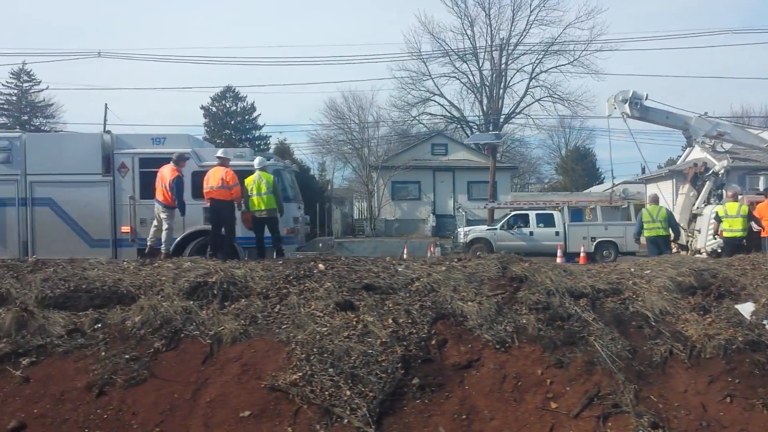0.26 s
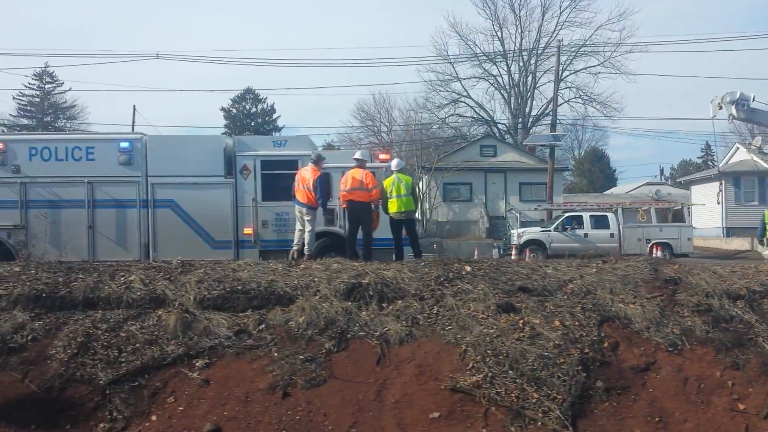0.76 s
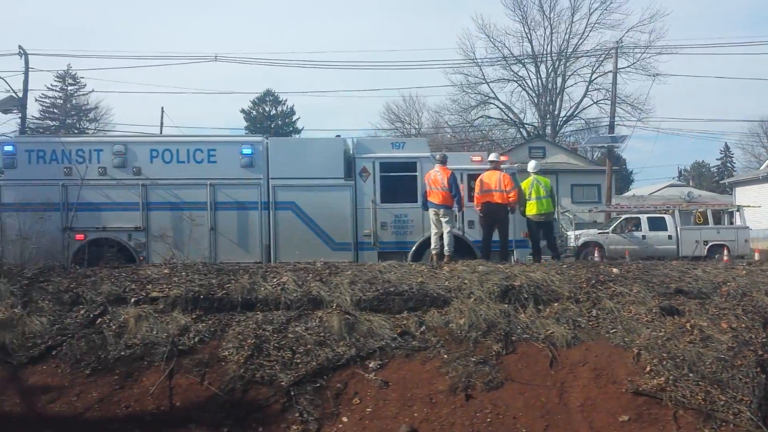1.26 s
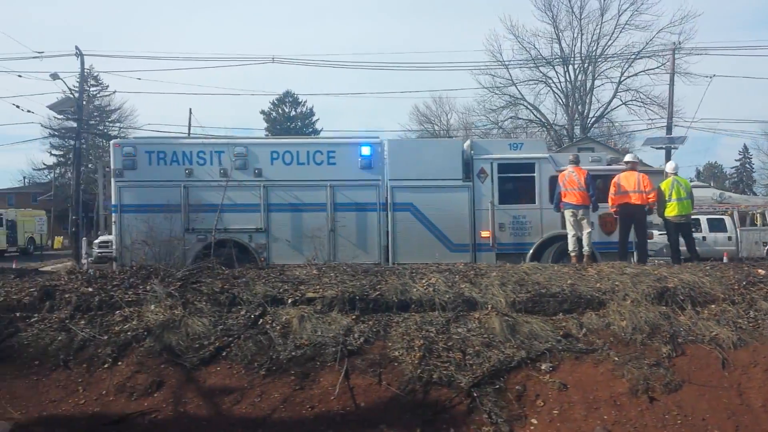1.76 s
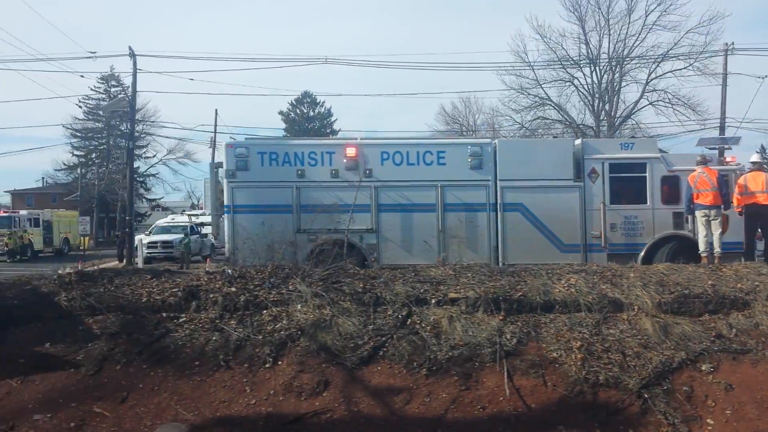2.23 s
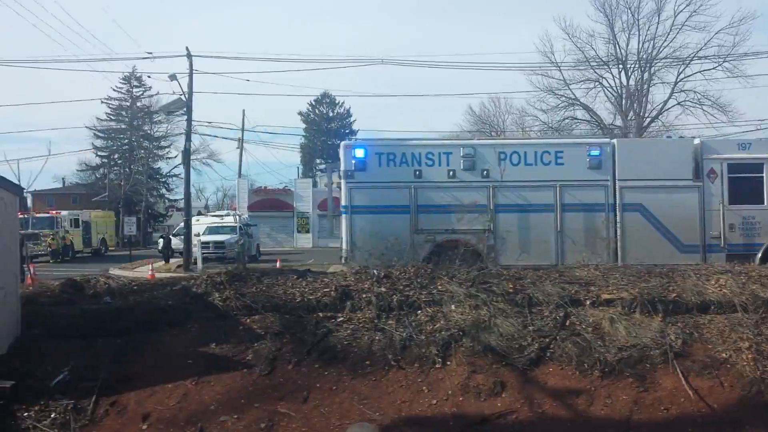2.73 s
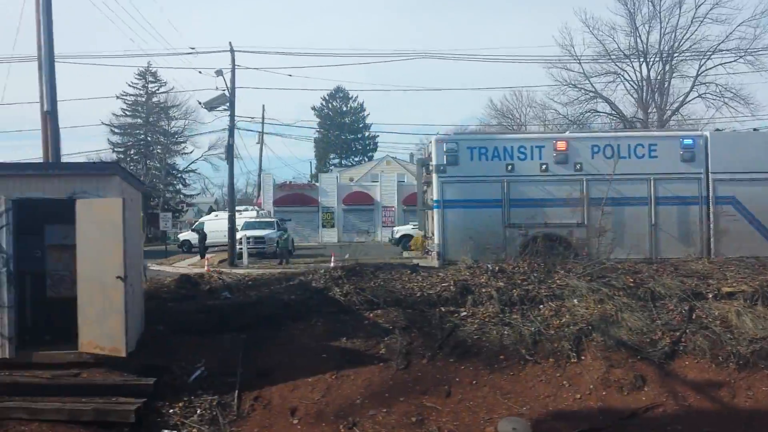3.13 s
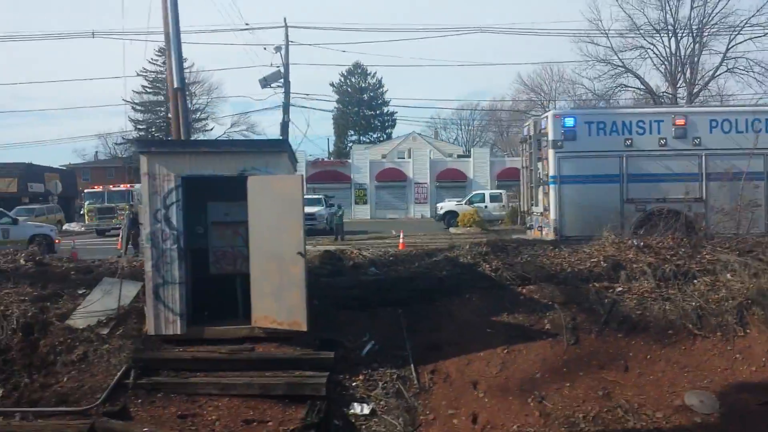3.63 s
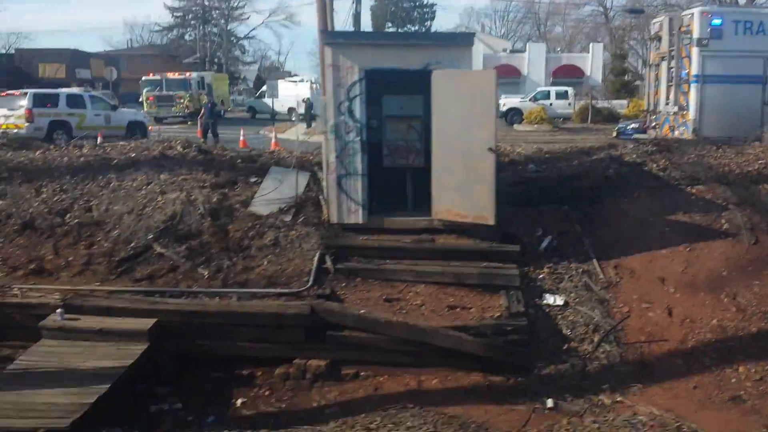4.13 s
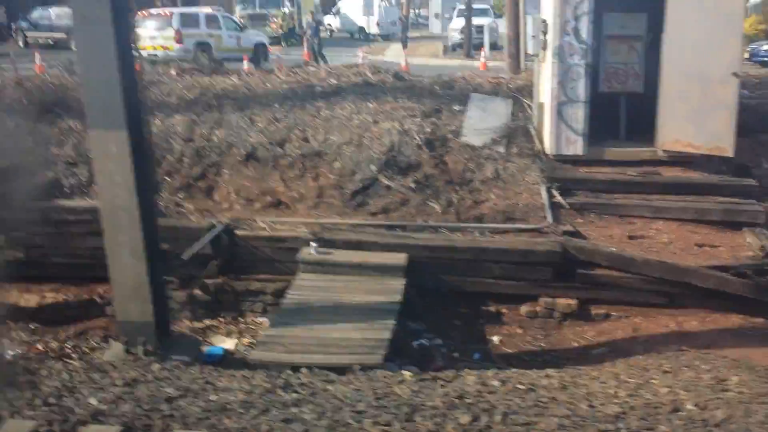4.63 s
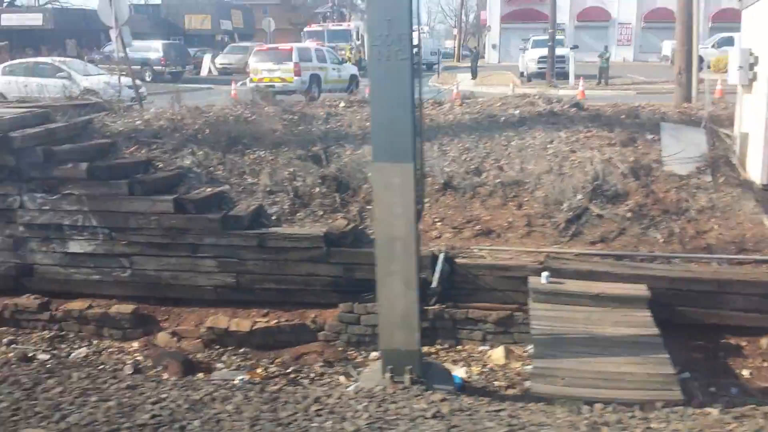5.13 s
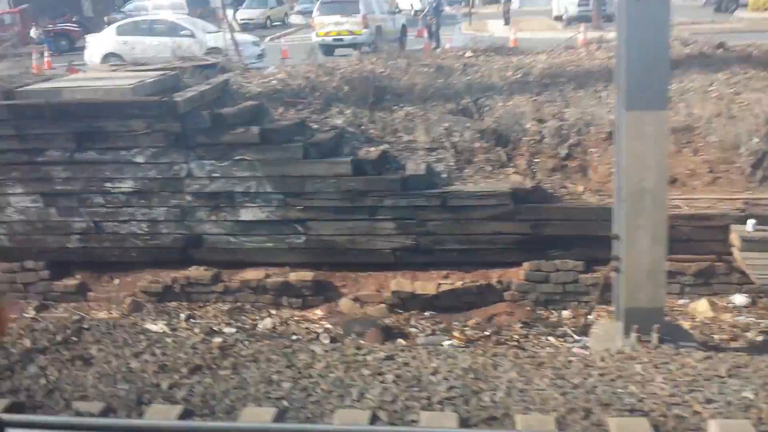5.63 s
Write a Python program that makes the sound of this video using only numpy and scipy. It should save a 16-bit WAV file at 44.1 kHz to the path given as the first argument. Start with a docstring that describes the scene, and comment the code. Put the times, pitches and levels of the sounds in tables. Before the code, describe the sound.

A low rumble, rushing air and electric hum inside a slowly rolling train, dipping briefly as fingers click on the microphone.

```python
"""A low rumble, rushing air and a whining hum inside a slowly rolling electric commuter train.
The wheels shake the car body, the ventilation blows through its ducts, and the traction transformer
sounds multiples of the 60 Hz supply. Fingers shift on a camera: its case ticks and pops, skin slides
past the microphone ports, and the cabin sound sinks for about two seconds."""
import sys
import numpy as np
from scipy.fft import rfft, irfft, next_fast_len
from scipy.io import wavfile
from scipy.ndimage import uniform_filter1d, map_coordinates

SR = 44100
rng = np.random.default_rng(int(sys.argv[2]) if len(sys.argv) > 2 else 0)


def output_pcm(signal):
    """Save a mono or channel-first signal as 16-bit PCM at the path in sys.argv[1].

    Samples are clipped to [-1, 1] before scaling.
    """
    pcm = np.clip(np.atleast_2d(signal).T, -1, 1) * 32767
    wavfile.write(sys.argv[1], SR, np.round(pcm).astype(np.int16))


N = 259292

PORT_HZ, PORT_WIDTH_HZ = 6320, 1300  # note of the port farther from the finger


def rumble():
    """Rolling wheels shake the low resonances of the car body."""
    # centre_hz, half_width_hz, level_db
    deep_modes = [(28, 6, -14), (49, 2.7, 0.5), (64.2, 3.8, 5.5), (86.4, 7.1, 6)]
    boom_modes = [(114, 9.4, -3.5), (126.5, 9.2, 2.5), (169.6, 10.4, -6.5), (224, 14, -12)]
    # time_s, deep_db, boom_db
    swell = [(0, 5, 2.5), (.3, 2, 4), (.54, -3.5, -0.5), (1.05, 1.5, 2), (1.3, 4, 0.5), (1.62, 0.5, 3.5),
             (1.85, 2, -5), (2.4, -4.5, 2), (3.1, 3, 0), (3.7, -4.5, -3), (4.1, -1, -5.5), (4.6, 4.5, 4.5),
             (5.3, 2, -4.5), (5.6, 9.5, 0.5), (5.88, 1, -1.5)]
    deep_swell_db, boom_swell_db = curves(swell)
    deep = amp(through_grip(-28, -44.5, -37.5) + deep_swell_db) * body_noise(deep_modes)
    boom = amp(through_grip(-24.5, -37.5, -23.5) + boom_swell_db) * body_noise(boom_modes)
    return deep + boom


def body_noise(modes, low_cut_hz=22):
    """Noise in low resonances, levelled because the wheels roll steadily."""
    boom = cabin_noise(lambda hz: modal_gain(hz, modes) * hz ** 6 / (hz ** 6 + low_cut_hz ** 6))
    power = uniform_filter1d(np.mean(boom ** 2, axis=0), size=7000)
    return boom / np.sqrt(np.abs(power))


def ventilation():
    """Air rushes through ducts, sounds the cabin's standing waves and hisses at the grilles."""
    # freq_hz, level_db
    air_spectrum = [(100, -4), (200, 2.5), (300, 0), (480, -4), (640, -5), (830, -7), (1000, -9.5),
                    (1250, -12), (1700, -11.5), (2100, -16.5), (3000, -25), (4500, -40), (8000, -79)]
    hiss_spectrum = [(1200, -25), (2200, 1.5), (3300, 2), (4500, 1.5), (5600, 4), (6600, 5), (8000, -4),
                     (10000, -11), (11500, -32.5), (15000, -61)]
    # centre_hz, half_width_hz, lift_db
    cabin_modes = [(406, 9.5, 0.5), (465.6, 6, 7), (531.4, 3.9, 13), (693, 7.2, 5), (1770, 130, -1)]
    lift_db = lambda hz: sum(db * resonance(hz, centre, width) for centre, width, db in cabin_modes)
    air_db = through_grip(-29, -43.5, -31.5) + 0.5 * wobble(9)
    air = cabin_noise(lambda hz: amp(along(air_spectrum, hz) + lift_db(hz)))
    hiss_db = through_grip(-40.5, -57, -48) + 0.14 * wobble(1.4)
    hiss = cabin_noise(lambda hz: amp(along(hiss_spectrum, hz)))
    return amp(air_db) * air + amp(hiss_db) * hiss


def transformer(supply_hz=60.09):
    """Supply harmonics stand as waves in the cabin; their balance shifts as the grip moves the camera."""
    # harmonic, level_db, moved_level_db
    drone = [(1, -31, -34.5), (2, -31.5, -30), (3, -32.5, -31.5)]
    # harmonic, level_db, moved_level_db, left_minus_right_db, left_lead_rad
    whine = [(4, -42, -43, -1, 0.5), (5, -41, -46, 13, -1.6), (6, -39.5, -40.5, -4.5, 0),
             (8, -41.5, -43.5, -2, 0), (12, -35.5, -43, -24.5, -3), (13, -40, -41.5, -4.5, 1.5),
             (14, -48.5, -49, -5.5, 0), (18, -54.5, -48, -4, 1), (20, -33, -34, -2.5, 1),
             (24, -40, -38.5, -5.5, -2.5), (25, -63, -49.5, -5, -1), (27, -51.5, -48.5, -21, 0.8),
             (28, -50, -42.5, 12, 1.5), (30, -42.5, -44, 0.5, 1.61), (31, -61, -54, 4, -3.5),
             (32, -63, -47.5, 22, 2), (34, -58.5, -61, 10, -0.5), (36, -56.5, -62, -8, -1),
             (38, -68, -68, 0, 1.5), (42, -58, -65, 5, -2), (44, -61, -63, 0, -1.5),
             (46, -58.5, -71, 8.5, 2), (47, -58, -67, -2, 0.5), (56, -62.5, -58.5, -2, 1.5),
             (60, -53, -65, 0, 2.5)]
    out = np.zeros((2, N))
    moved = gripped()
    supply_rad = 2 * np.pi * supply_hz * clock() + 0.0093 * wobble(1.4)
    for harmonic, db, moved_db in drone:  # long waves: in phase at both ports
        phase = harmonic * supply_rad + rng.uniform(0, 2 * np.pi) + 0.26 * wobble(4.13)
        level_db = db + moved * (moved_db - db) + 1.96 * wobble(4.104)
        out += pan(lean_db=1.7) * amp(level_db) * np.sin(phase)
    for harmonic, db, moved_db, lean_db, lead_rad in whine:
        sway_db = 0.29 * np.array([wobble(4.92), wobble(4.66)])  # car sway shifts the standing waves
        phase = harmonic * supply_rad + rng.uniform(0, 2 * np.pi) + 0.32 * wobble(7)
        port_rad = np.array([[lead_rad], [-lead_rad]]) / 2
        level_db = db + moved * (moved_db - db) + sway_db
        out += pan(lean_db) * amp(level_db) * np.sin(phase + port_rad)
    return np.sqrt(2) * out * amp(through_grip(-0.5, -14.5, -5.5))


def case_ticks(ring_low_hz=3700, top_hz=14260, spot_db=1.34, spot_hz=900,
               port_db=-4.5, leak_db=-8.5, far_delay_s=.00035):
    """The case snaps under the fingers; the far port answers later on its own note."""
    # start_s, level_db, ring_hz, tap_re_ring_db, crack_re_ring_db, left_minus_right_db
    ticks = [(2.5917, 3, 5770, -17, -5, -13), (2.6401, 9, 6300, -18, -2, 1), (2.6418, 11, 7500, -17, -6, 6),
             (2.6427, 17.5, 6900, -6.5, -8, 11), (2.6604, -1.5, 6700, 1.5, -16, -10),
             (2.6774, -3.5, 5630, -15, -4, -22), (2.7346, 1, 5720, -2, -20, -4),
             (2.7375, -3, 7500, -11, -15, 6), (2.826, -10, 6180, 3, -14, 4),
             (2.8396, 10, 6700, -8, -17, -9), (2.8596, 8, 6470, -17, -12, -24),
             (2.9827, 5.5, 5800, -0.5, -15, -9), (3.1096, -14, 7140, -21, -2, 13),
             (3.3075, 12.5, 5417, -16, -2, -11), (3.4647, 13, 6450, -19, -10, -22),
             (3.4665, -0.5, 6940, -2.5, -8, 0), (3.6021, 2.5, 5070, -12, -14, -9),
             (3.9545, 5, 5900, -10, -9.6, -13), (3.9908, -12, 4140, 7, -26, -15),
             (4.004, -1.3, 6400, 0.5, -15, 3), (4.0434, 11, 5900, -25, -5.5, -16),
             (4.0994, -8, 5300, -13, -26, -14), (4.6192, -16.5, 3730, 7, -20, -17),
             (4.7131, -12, 3960, 2, -25, -6), (5.1005, 10.5, 7300, -11, -6, 3),
             (5.1013, 14, 7050, -4.5, -14, 14), (5.1427, 0, 6240, 4, -17, -0.5),
             (5.1751, -13, 5950, -6, 2, 0.5), (5.3099, 12, 5850, -17, -16, -19),
             (5.6371, 3, 6000, -10, -10, -12)]
    # freq_hz, level_db
    crack_spectrum = [(4000, -33), (7500, -18), (9300, 0), (11500, -4.5), (13800, -3)]
    out = np.zeros((2, N + SR))
    hz = np.fft.rfftfreq(1024, 1 / SR)
    lowpass = 1 / (1 + (hz / top_hz) ** 60)
    for start_s, db, ring_hz, tap_db, crack_db, lean_db in ticks:
        ring = resonance(hz, ring_hz, width_hz=2100) / (1 + (ring_low_hz / (hz + 1)) ** 10)
        tap = amp(tap_db) * resonance(hz, centre_hz=2850, width_hz=1300) ** 2
        crack = amp(crack_db + along(crack_spectrum, hz))
        # each touch lands on another spot, with its own spectral ripple
        ripple_db = spot_db * map_coordinates(rng.standard_normal(40), [hz / spot_hz], mode="nearest")
        near = np.sqrt(ring ** 2 + tap ** 2 + crack ** 2) * amp(ripple_db)
        port_note = amp(port_db) * resonance(hz, PORT_HZ, PORT_WIDTH_HZ)
        far = amp(-abs(lean_db)) * (port_note + amp(leak_db) * near)
        near_port = int(lean_db < 0)
        for port, gain, delay_s in (near_port, near, 0), (1 - near_port, far, far_delay_s):
            snap = amp(db) * struck(gain * lowpass)
            start = round((start_s + delay_s) * SR)
            out[port, start:start + len(snap)] += snap
    return out[:, :N]


def fingertip_pops(rise_s=0.00011):
    """A fingertip leaves a port; the hollow case answers with a thud and a knock."""
    # start_s, thud_db, knock_db, left_minus_right_db
    pops = [(2.6425, -32, -13.5, -1), (2.8372, -17, -3.5, -19), (2.983, -44, -12.5, -21),
            (3.3073, -45, -15.5, -21), (4.0438, -45, -19, -13), (5.1008, -35, -24, -25)]
    # pitch_hz, t60_s
    hollow_modes = [(430, 0.0026), (1180, 0.0031)]
    out = np.zeros((2, N))
    for start_s, *notes_db, lean_db in pops:
        age_s = np.maximum(clock() - start_s, 0)
        onset = pan(lean_db) * (1 - np.exp(-age_s / rise_s))
        for (hz, t60_s), db in zip(hollow_modes, notes_db):
            decay_db = np.minimum(60 * age_s / t60_s, 200)
            out += onset * amp(db - decay_db) * np.sin(2 * np.pi * hz * age_s)
    return out


def skin_slides(drag_db=1.8, whistle_db=-6):
    """Skin drags over the case in grainy swishes; the far port whistles on its own note."""
    # middle_s, sigma_s, level_db, left_minus_right_db
    slides = [(2.674, 0.017, -44, -15), (2.736, 0.011, -39, -11), (2.898, 0.0053, -44.5, -3),
              (3.305, 0.035, -53, -22), (3.477, 0.018, -52.5, 1), (3.66, 0.026, -45.5, -27),
              (3.834, 0.12, -52.5, -27), (3.96, 0.016, -44, -15), (5.766, 0.17, -48, -10)]
    # freq_hz, level_db
    skin_spectrum = [(1500, -13), (4000, -3), (6000, 2), (9000, 1.5), (12300, -5.5), (13600, -9),
                     (14600, -40)]
    grain = amp(drag_db * wobble(90)) * grit(rate_hz=4500, spread_db=2)
    swish = unit(filtered(grain, lambda hz: amp(along(skin_spectrum, hz))))
    whistle = amp(whistle_db) * unit(filtered(grain, lambda hz: resonance(hz, PORT_HZ, PORT_WIDTH_HZ)))
    out = np.zeros((2, N))
    for middle_s, sigma_s, db, lean_db in slides:
        far_side = np.array([[lean_db < 0], [lean_db >= 0]])
        out += amp(db) * bump(middle_s, sigma_s) * (pan(lean_db) * swish + far_side * whistle)
    return out


def scuff(start_s=4.395, attack_s=.004, fade_s=0.061, level_db=-34, top_hz=9500):
    """Something scrapes briefly in the car: a run of catches rings its resonances."""
    # centre_hz, half_width_hz, level_db
    modes = [(1170, 110, -6), (1450, 70, -1.5), (1720, 130, 0), (2120, 220, -6), (2800, 180, -14),
             (3370, 230, -8), (3900, 350, -17), (5370, 530, -17), (6800, 1800, -20.5)]
    age_s = np.maximum(clock() - start_s, 0)
    stroke = amp(level_db) * (1 - np.exp(-age_s / attack_s)) / (1 + (age_s / fade_s) ** 3)
    catches = grit(rate_hz=5000, spread_db=2.5)
    rasp = unit(filtered(catches, lambda hz: modal_gain(hz, modes) / (1 + (hz / top_hz) ** 16)))
    return pan(lean_db=6) * stroke * rasp


def spurt(level_db=-35):
    """A short, narrow, grainy hiss on the left."""
    # freq_hz, level_db
    spectrum = [(3500, -27), (5600, -9), (6500, -3), (6950, -3), (7500, -7), (10000, -19), (12000, -50),
                (14000, -92)]
    grain = amp(1.4 * wobble(130)) * grit(rate_hz=3300, spread_db=5)
    hiss = unit(filtered(grain, lambda hz: amp(along(spectrum, hz))))
    return pan(lean_db=26) * amp(level_db) * bump(middle_s=2.232, sigma_s=0.046) * hiss


def singing_air(level_db=-40):
    """A faint hollow band swells in the rush just before the cabin sound sinks."""
    swell = bump(middle_s=2.52, sigma_s=0.24) * (1 - gripped())
    return amp(level_db) * swell * cabin_noise(lambda hz: resonance(hz, centre_hz=1820, width_hz=170))


def gripped(start_s=2.604, halfway_s=0.044):
    """Closure of the hand on the camera, 0 to 1: fast, then ever slower."""
    age_s = np.maximum(clock() - start_s, 0)
    return age_s / (age_s + halfway_s)


def through_grip(before_db, during_db, after_db, release_s=4.757, recover_s=0.37, squeeze_db=-4.5):
    """Layer level in dB: sinks as the hand closes, dips at a squeeze, rises as it opens."""
    released = np.clip((clock() - release_s) / recover_s, 0, 1)
    dip_db = squeeze_db * bump(middle_s=3.32, sigma_s=0.12)
    return before_db + (during_db - before_db) * gripped() + (after_db - during_db) * released + dip_db


def cabin_noise(colour, alike_below_hz=480):
    """Diffuse noise, rms 1: alike at both ports in the bass, unrelated in the treble."""
    # freq_hz, left_minus_right_db
    lean = [(100, 1), (380, 3), (800, 2), (2300, 1.5), (4400, 6), (8000, 11), (12000, -34)]
    alike = lambda hz: .99 / (1 + (hz / alike_below_hz) ** 2.8)
    white = rng.standard_normal((2, N))
    mid, side = filtered(white, lambda hz: colour(hz) * np.sqrt([1 + alike(hz), 1 - alike(hz)]))
    return unit(filtered(np.array([mid + side, mid - side]), lambda hz: pan(along(lean, hz))))


def grit(rate_hz, spread_db):
    """Tiny catches of uneven size at random times; stereo, rms 1."""
    catches = rng.random((2, N)) < rate_hz / SR
    return unit(catches * rng.choice([-1, 1], (2, N)) * amp(spread_db * rng.standard_normal((2, N))))


def struck(gain):
    """Minimum-phase ring of a body with this spectrum after one sharp blow."""
    cepstrum = irfft(np.log(np.maximum(gain, 1e-4)))
    half = cepstrum.shape[-1] // 2
    cepstrum[..., 1:half] *= 2
    cepstrum[..., half + 1:] = 0
    return irfft(np.exp(rfft(cepstrum)))


def resonance(hz, centre_hz, width_hz):
    """Gain 1 at the centre, 1/2 at width_hz to either side."""
    return 1 / (1 + ((hz - centre_hz) / width_hz) ** 2)


def modal_gain(hz, modes):
    """Gain of resonances summed in power."""
    return np.sqrt(sum((amp(db) * resonance(hz, centre, width)) ** 2 for centre, width, db in modes))


def filtered(x, response):
    """Filter x by the gain response(hz)."""
    size = next_fast_len(N + 8192)
    return irfft(rfft(x, size) * response(np.fft.rfftfreq(size, 1 / SR)), size)[..., :N]


def pan(lean_db):
    """Constant-power stereo gains; positive leans left."""
    gains = amp(np.array([lean_db, -lean_db]).reshape(2, -1) / 2)
    return gains / np.sqrt(np.mean(gains ** 2, axis=0))


def wobble(rate_hz):
    """Smooth random curve, rate_hz knots a second."""
    knots = rng.standard_normal(int(N * rate_hz / SR) + 4)
    return map_coordinates(knots, [clock() * rate_hz], mode="nearest")


def bump(middle_s, sigma_s):
    """Gaussian swell of height 1."""
    return np.exp(-((clock() - middle_s) / sigma_s) ** 2 / 2)


def along(points, hz):
    """Interpolate (freq_hz, value) points on a log axis."""
    freqs_hz, values = np.transpose(points)
    return np.interp(np.log(hz + 1), np.log(freqs_hz + 1), values)


def curves(rows):
    """Per-sample curve for each column after time_s."""
    time_s, *columns = np.transpose(rows)
    return [np.interp(clock(), time_s, column) for column in columns]


def clock():
    """Sample times in s."""
    return np.arange(N) / SR


def amp(db):
    """Decibels to gain."""
    return 10 ** (np.asarray(db) / 20)


def unit(x):
    """Scale to rms 1."""
    return x / np.sqrt(np.mean(x ** 2) + 1e-20)


def scene():
    """The cabin, with handling sounds on top."""
    cabin = rumble() + ventilation() + transformer() + singing_air() + spurt() + scuff()
    return cabin + case_ticks() + fingertip_pops() + skin_slides()


def record(dry):
    """The camera rounds off the sharpest peaks and limits the band."""
    ceiling, top_hz, taper_hz = .85, 16000, 800
    rounded = dry / (1 + np.abs(dry / ceiling) ** 8) ** (1 / 8)
    return filtered(rounded, lambda hz: np.clip((top_hz - hz) / taper_hz, 0, 1))


dry = scene()
out = record(dry)
output_pcm(out)
```